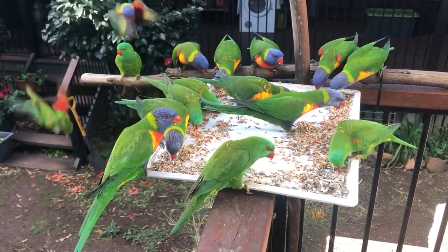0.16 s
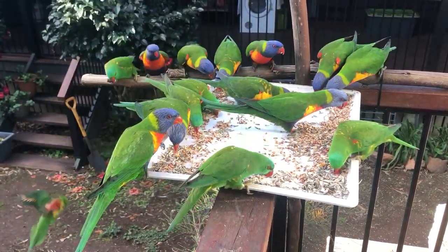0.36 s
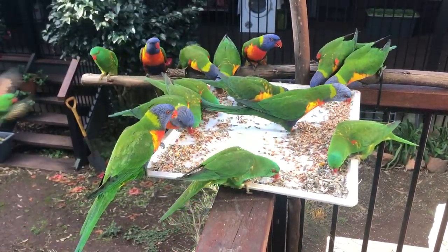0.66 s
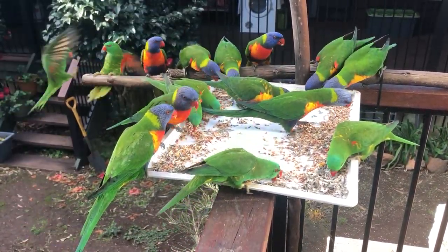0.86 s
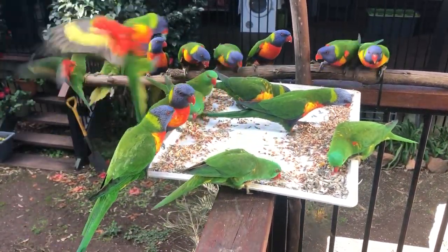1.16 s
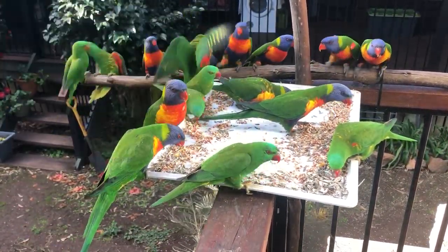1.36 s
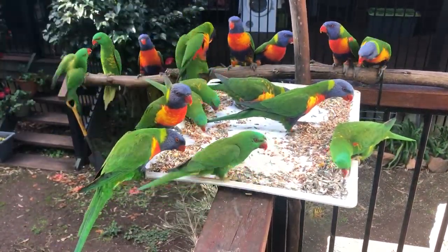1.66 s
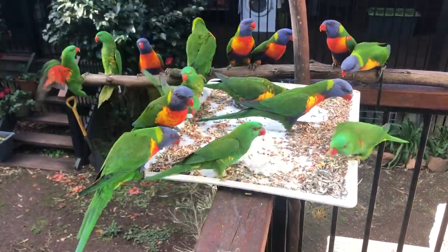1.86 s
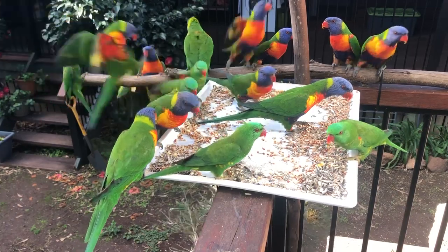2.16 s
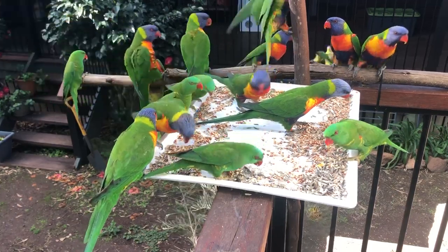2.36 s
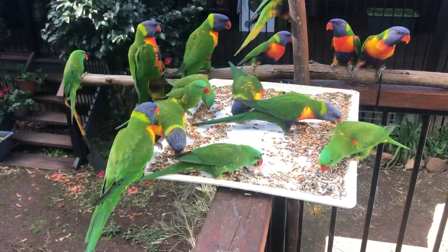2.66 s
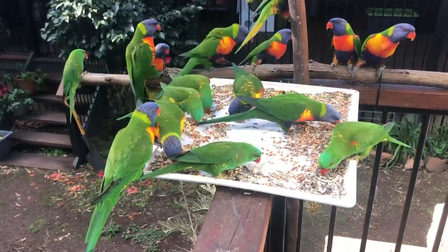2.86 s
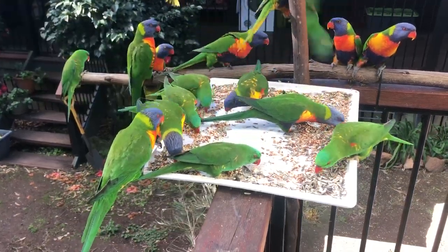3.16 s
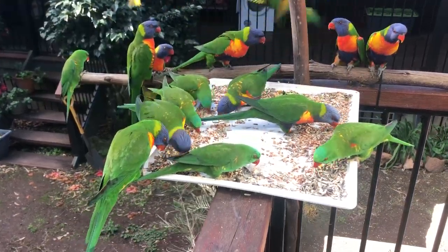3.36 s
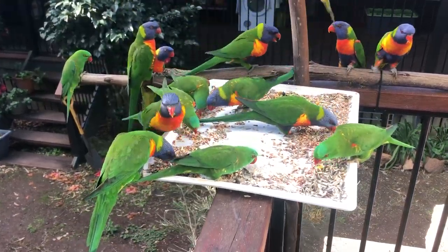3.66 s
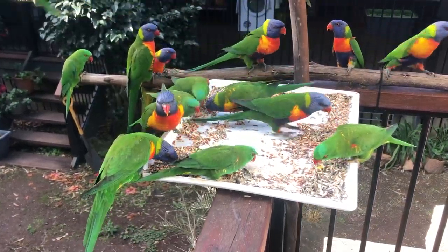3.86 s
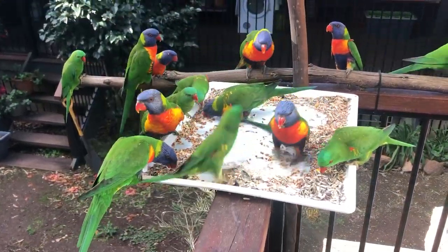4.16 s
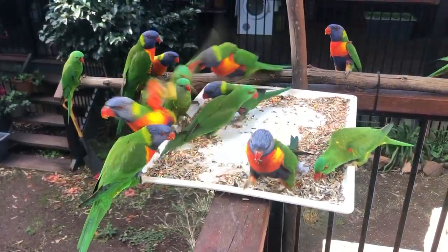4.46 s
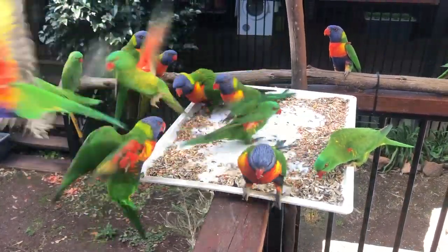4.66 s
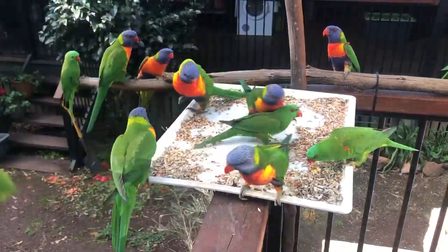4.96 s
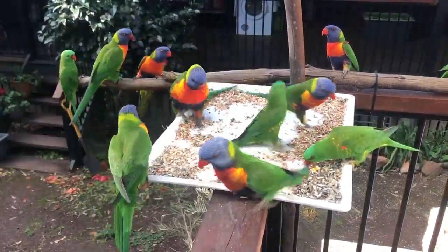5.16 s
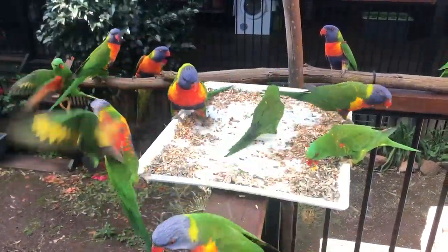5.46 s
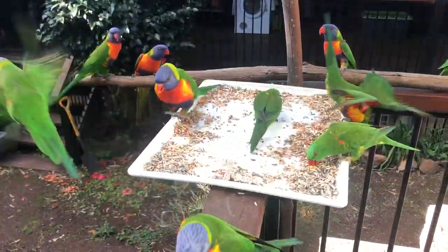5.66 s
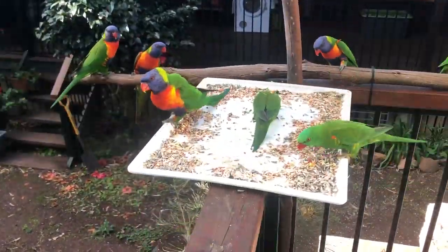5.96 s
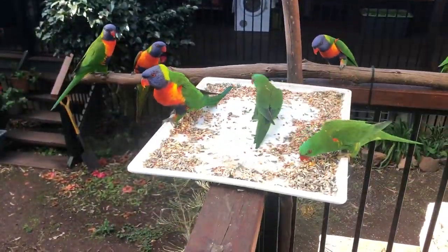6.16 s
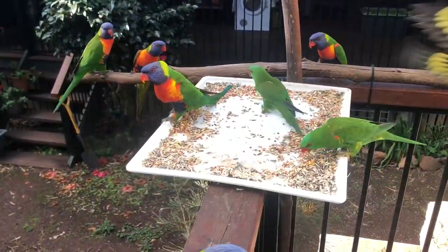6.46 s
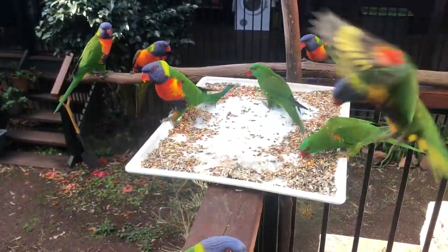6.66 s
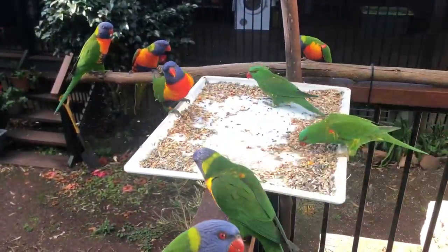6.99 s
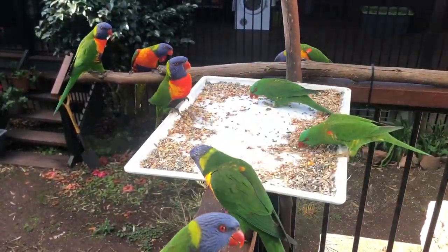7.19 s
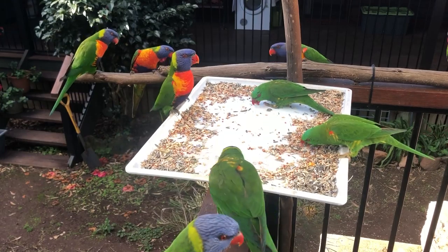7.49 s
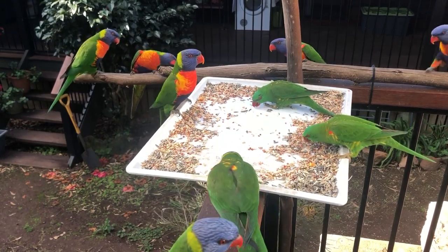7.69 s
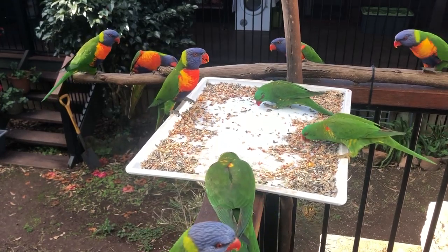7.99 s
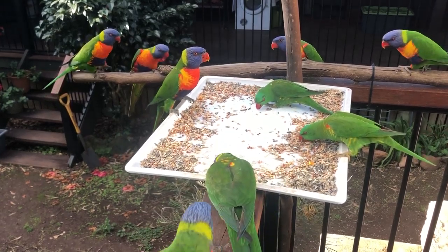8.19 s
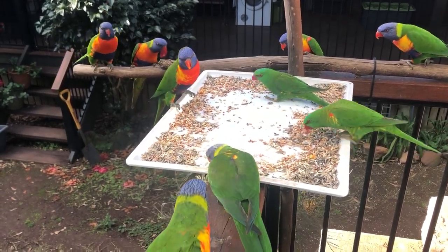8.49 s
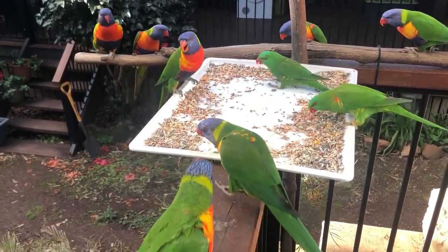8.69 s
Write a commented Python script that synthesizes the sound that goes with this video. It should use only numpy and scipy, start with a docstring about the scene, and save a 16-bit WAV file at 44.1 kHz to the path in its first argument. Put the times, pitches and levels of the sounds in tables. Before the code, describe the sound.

Small parrots squabble outdoors: shrill cracking squeals and buzzing harsh screeches in bursts, soft chatter, light seed ticks and faint wing flutter between.

```python
"""A flock of lorikeets squabbles at a seed tray on an outdoor deck.
Whistled calls glide, break upward, chirp or growl; screeches and squawks are low voices shaken by a fast
rasp; four loud yelps sweep up and tip over. Soft chatter, puffs of filtered noise for wingbeats and short
noise taps for beaks and seeds fill in. Short echoes come from tray, deck and house wall; the air rumbles."""
import sys
import numpy as np
from scipy import signal
from scipy.fft import rfft, irfft, next_fast_len
from scipy.io import wavfile
from scipy.ndimage import uniform_filter1d, minimum_filter1d, map_coordinates

SR = 44100
rng = np.random.default_rng(int(sys.argv[2]) if len(sys.argv) > 2 else 0)


def unload_audio(sound):
    """Save the sound as a 16-bit wav file, at the path given as the first command line argument."""
    columns = np.transpose(np.atleast_2d(sound))
    # keep every value between -1 and 1, then stretch to whole-number steps
    steps = np.round(np.clip(columns, -1, 1) * 32767)
    wavfile.write(sys.argv[1], SR, steps.astype(np.int16))


N = 389403
TIME = np.arange(N) / SR
TOP_HZ = 16000  # no partial is made above this, and the final low-pass cuts everything above it
FAR_DB = -25.5  # calls with a lower level than this count as far birds

# Roughness is 0 for a clean voice, about 1 for a very rough one. Spectra give relative levels.
# air and flock: [t/s, rumble level/dB, rustle level/dB]
STIR = [(0, -52, -52.5), (.7, -59, -49), (1.3, -54, -52), (2.1, -51, -55), (3.2, -55, -53), (3.5, -55, -44),
        (4.3, -65, -49.5), (4.9, -47.5, -47), (5.55, -48.5, -51), (6.9, -53.5, -53), (7.499, -59.5, -63.5),
        (8.8, -67.5, -58)]
# colour of the low air and of feathers and seed: [f/Hz, level/dB]
RUMBLE_COLOUR = [(25, -47), (50, 1), (135, -6.5), (350, -17), (700, -14.5), (1500, -15), (3000, -63)]
RUSTLE_COLOUR = [(200, 8), (1000, 2), (1900, 6.5), (5500, 5), (15500, -3.5)]
# chirps that dip in the middle: [start t/s, end t/s, pitch f/Hz, level/dB, slide/octaves]
CHIRPS = [(.005, .04, 1856, -48, .2), (.076, .125, 1790, -45, 0.037), (.152, .219, 1635, -45, 0.15),
          (.236, .255, 2000, -39.5, -0.16), (.369, .384, 1900, -46, -0.4),
          (1.686, 1.732, 3350, -18.5, -0.12)]
# overtones of chirps and growls: [f/Hz, level/dB]
SOFT_THROAT = [(3000, 4), (5000, -1), (9000, -7.5), (15500, -17.5)]
# overtones of the other whistled calls: [f/Hz, level/dB]
WHISTLE_THROAT = [(2000, -10), (3000, 25), (4400, 14.5), (6000, 3.5), (7500, -5), (9000, -3), (11500, -5.5),
                  (13000, -16.5), (15500, -20)]
# beaks on seeds and tray: [t/s, peak level/dB]
TICKS = [(2.233, -23.5), (4.433, -29), (4.764, -24), (4.921, -21.5), (5.408, -29), (5.435, -23),
         (7.128, -27), (7.194, -28.5)]
# colour of a tap: [f/Hz, level/dB]
TICK_COLOUR = [(120, -20), (1000, -2), (6000, -10.5), (15000, -19.5)]
# rough sagging growls: [start t/s, end t/s, pitch f/Hz, level/dB]
GROWLS = [(.267, .293, 2065, -35), (.384, .468, 1940, -32), (.47, .55, 1795, -36), (3.99, 4.094, 1910, -42),
          (7.6, 7.75, 1380, -53), (8.666, 8.707, 1790, -40)]
# thin whistles of birds further off: [start t/s, end t/s, pitch f/Hz, level/dB]
WHISTLES = [(.525, .625, 4484, -35.5), (.61, .72, 3810, -34), (1.465, 1.5, 5230, -35),
            (2.417, 2.586, 4744, -36), (2.545, 2.588, 3840, -35.5), (2.964, 2.985, 5070, -34.5),
            (3.02, 3.059, 5400, -31)]
# screeches: [start t/s, end t/s, pitch f/Hz, level/dB, swell/dB, beak resonance f/Hz,
#             treble/dB per octave, rasp rate f/Hz, roughness]
SCREECHES = [ (0.716, 0.785, 1408, -24.5, 1, 4800, 7, 115.7, 1.13),
             (1.031, 1.148, 1043, -31, -4, 4150, 7, 115.7, 0.99),
             (1.487, 1.584, 1215, -15.5, -1, 5100, 9.5, 101.1, .8),
             (1.601, 1.65, 1095, -16, -6, 3900, 6.5, 128.2, 1.06),
             (1.71, 1.854, 1122, -17, -6.5, 4590, 8.5, 95.4, 0.9),
             (3.075, 3.096, 1111, -31.5, 2, 4700, 13.5, 120, 0.8),
             (4.082, 4.279, 1114, -21.5, 5.5, 7040, 5.5, 103.9, .95),
             (4.288, 4.378, 1133, -42.5, 1, 5700, 12, 103, 0.6),
             (5.443, 5.511, 1005, -24.5, 4, 3500, 2.5, 168, 1.09),
             (5.617, 5.844, 950, -16, 0, 3760, 5, 170, 0.75),
             (6.937, 7.038, 1205, -41.5, -5, 4070, 4.5, 129.3, 0.66)]
# overtones of a screech: [f/Hz, level/dB]
SCREECH_THROAT = [(450, -19.5), (950, 0.5), (1600, -3), (2800, 5), (4400, 2.5), (5600, 3), (7500, -4.5),
                  (9500, -8.5), (11000, -11.5), (15500, -23)]
# unbroken low-register glides: [overtones/dB, roughness, path of [t/s, pitch f/Hz, level/dB]]
SQUEALS = [ (0, 0.16, [(.744, 3150, -17.5), (.775, 2816, -27.5), (.81, 3296, -11), (.832, 3275, -13),
           (.897, 3867, 0), (.93, 3680, -12), (1.0, 3630, -10.5)]), (0.5, 0.17, [(2.292, 2760, -33),
           (2.322, 2510, -24), (2.34, 3080, -20.5), (2.378, 2600, -21.5), (2.41, 2935, -15.5),
           (2.45, 2825, -15.5), (2.486, 3017, -22)]), (-3.5, 0.5, [(2.762, 2360, -23), (2.79, 3110, -18.5),
           (2.888, 2435, -28), (2.911, 2655, -22.5)]), (-11.5, 0.036, [(3.642, 3190, -19),
           (3.69, 2920, -12.5), (3.718, 3190, -15), (3.738, 3570, -8.3), (3.758, 3760, -9.5),
           (3.841, 3796, -8.5), (3.849, 3480, -23)]), (8.5, .04, [(7.494, 1994, -44.5), (7.522, 2055, -38),
           (7.555, 2410, -33.5), (7.585, 3077, -22), (7.626, 3180, -14)]), (2, 0.11, [(7.607, 2648, -20),
           (7.655, 3118, -18), (7.713, 3200, -12.5), (7.73, 2650, -13.5)]), (5, 0.53, [(7.745, 2640, -36),
           (7.773, 3260, -19), (7.79, 2774, -18.5), (7.83, 2766, -22.5), (7.888, 3244, -18.5)]),
           (2.5, 0.31, [(7.886, 3245, -25), (7.91, 3075, -17), (7.945, 3280, -26), (7.975, 3240, -20.5),
           (8.01, 2745, -23.5)])]
# flips into the pure high register: [start t/s, end t/s, pitch f/Hz, level/dB, slide/octaves]
BREAKS = [(0.786, 0.813, 4375, -15, 0.062), (0.84, 0.894, 4637, -10.5, -0.01), (.966, 1, 4340, -12, -0.1),
          (2.292, 2.306, 3290, -23, .13), (2.343, 2.369, 4035, -13.5, -0.25),
          (2.79, 2.807, 4102, -11, 0.0091), (2.82, 2.835, 3460, -11, -0.28),
          (2.853, 2.892, 3780, -11, -.16), (3.643, 3.665, 3790, -11.5, -0.3),
          (3.69, 3.712, 3860, -8, -0.051), (7.827, 7.85, 4176, -16.5, -0.0012)]
# flights: [start t/s, end t/s, wingbeat rate f/Hz, level/dB]
FLIGHTS = [(1.878, 2.245, 16.2, -45), (4.604, 5.065, 15.1, -42.5), (5.885, 6.983, 14.3, -49.5)]
# colour of a wingbeat: [f/Hz, level/dB]
WING_COLOUR = [(30, 2), (110, 6), (400, -6), (1300, -4), (2000, 0.5), (3000, -18), (15000, -19)]
# rising croaks: [start t/s, end t/s, pitch f/Hz, level/dB, roughness]
CROAKS = [(2.235, 2.274, 984, -45, 0.24), (2.272, 2.316, 1837, -35.5, 0.4), (2.696, 2.717, 1276, -34, 0.65),
          (2.729, 2.758, 1225, -24.5, 0.54), (3.543, 3.567, 1700, -24, 0.1),
          (3.554, 3.636, 1475, -19, 0.01), (5.2, 5.227, 2984, -21, 0.13), (8.696, 8.704, 1080, -30.5, 0.65)]
# squawks: [start t/s, end t/s, pitch f/Hz, level/dB, swell/dB]
SQUAWKS = [(4.467, 4.591, 1112, -15, 1.5), (5.082, 5.202, 1078, -13, -8.5)]
# how a squawk cracks and clears: [share of its length, roughness]
SQUAWK_ROUGH = [(0.221, .1), (0.382, 0.9), (.72, .7), (.95, 0.4)]
# yelps: [t of the top/s, top pitch f/Hz, level at full effort/dB]
YELPS = [(8.115, 3117, -10), (8.371, 3116, -9), (8.564, 3056, -8), (8.793, 3016, -9.5)]
# shape of a yelp: [t from its top/s, share of the top pitch, effort level/dB]
YELP_SHAPE = [(-.092, .59, -27), (-.072, .67, -12.5), (-.06, .76, -14.5), (-.048, 0.807, -2.5),
              (-.022, .94, -0.5), (-.004, 0.99, -0.5), (0.01, .98, -0.5), (.021, .87, -6.5),
              (0.033, 0.774, -16)]
# overtones of a yelp: [f/Hz, level/dB]
YELP_THROAT = [(1800, -3.5), (3100, 0), (3900, -12.5), (5000, 12.5), (6100, 6.5), (7500, 0), (9200, 0),
               (12000, -6), (15500, -15)]
# first echoes from tray, deck, rail and wall: [delay t/s, level/dB]
ECHOES = [(.0023, -17), (.0061, -17), (0.0098, -22.5)]
# colour of the later echoes: [f/Hz, level/dB]
ECHO_COLOUR = [(300, -8.0), (2000, -5.5), (5500, -7.5), (9000, -10.5), (15000, -3)]


def undb(db):
    """Decibels to gain."""
    return 10 ** (np.asarray(db) / 20)


def unit(x):
    """Scale to an rms (average strength) of 1."""
    return x / np.sqrt(np.mean(x ** 2) + 1e-18)


def gain_at(hz, points):
    """Gain of a spectrum table at the given frequencies."""
    f, db = np.transpose(points)
    return undb(np.interp(np.log(np.maximum(hz, 1)), np.log(f), db))


def colour(x, points):
    """Filter by a spectrum table, then scale to rms 1."""
    size = next_fast_len(len(x))
    gains = gain_at(np.fft.rfftfreq(size, 1 / SR), points)
    return unit(irfft(rfft(x, size) * gains, size)[:len(x)])


def walk(count, rate):
    """A smooth random wander through `rate` random values a second; its spread is near 1."""
    at = np.arange(count) * rate / SR
    return map_coordinates(rng.standard_normal(4096), [at], order=3, mode="wrap")


def fade(count, attack, release):
    """Rounded rise and fall of a sound; both times in seconds."""
    t = np.arange(count) / SR
    rise = np.sin(np.pi / 2 * np.clip(t / attack, 0, 1))
    fall = np.sin(np.pi / 2 * np.clip(t[::-1] / release, 0, 1))
    return rise * fall


def add(out, start, x):
    """Mix a sound in at its time."""
    i = max(int(start * SR), 0)
    x = x[:max(N - i, 0)]
    out[i:i + len(x)] += x


def surroundings():
    """Low stirring air, and the rustle of feathers and seed: two noises of wandering level."""
    s, low_db, high_db = np.transpose(STIR)
    rumble_db = np.interp(TIME, s, low_db) + 2 * walk(N, 13)
    rumble = colour(rng.standard_normal(N), RUMBLE_COLOUR) * undb(rumble_db)
    rustle_db = np.interp(TIME, s, high_db) + 2 * walk(N, 26)
    rustle = colour(rng.standard_normal(N), RUSTLE_COLOUR) * undb(rustle_db)
    return rumble + rustle


def bend(seconds, hz, slide, arch):
    """A pitch that slides from start to end and arches in the middle, both in octaves."""
    u = np.linspace(-1, 1, int(max(seconds, .005) * SR))
    return hz * 2 ** (slide * u / 2 - arch * u ** 2)


def harmonics(hz, lag=0.25):
    """All partials of the syrinx (a bird's voice organ), one row each; the windpipe delays upper ones."""
    k = np.arange(1, int(TOP_HZ / hz.min()) + 2)[:, None]
    phase = k * 2 * np.pi * np.cumsum(hz) / SR - lag * k ** 2
    return k * hz, np.sqrt(2) * np.sin(phase) * (k * hz < TOP_HZ)


def syrinx(hz, db, over_db, rough, throat=WHISTLE_THROAT, jitter=0.065, trill=0.033, trill_hz=150,
           shimmer_db=4, waver=0.012, waver_db=2):
    """A near-pure wavering whistle; when rough, the membranes flutter and the pitch trembles."""
    n = len(hz)
    flutter = np.sin(2 * np.pi * np.cumsum(trill_hz * (1 + 0.092 * walk(n, 69.6))) / SR)
    # tremble and flutter grow with roughness, the slower waver with its square root
    shake = rough * (jitter * walk(n, 1394) + trill * flutter)
    slow_waver = waver * np.sqrt(abs(rough)) * walk(n, 103)
    f, waves = harmonics(hz * (1 + shake + slow_waver))
    overtones = unit((gain_at(f[1:], throat) * waves[1:]).sum(0) * undb(2 * walk(n, 88.2)))
    share = undb(over_db)
    tone = (waves[0] + share * overtones) / np.hypot(1, share)
    tremor_db = rough * shimmer_db * (flutter + walk(n, 400)) / 2 + waver_db * walk(n, 64.6)
    return undb(db) * tone * unit(undb(tremor_db)) * fade(n, 0.0018, 0.0011)


def note(seconds, hz, db, slide, arch, over_db, rough, throat=WHISTLE_THROAT):
    """One short bent note from the syrinx."""
    return syrinx(bend(seconds + 0.0014, hz, slide, arch), db, over_db, rough, throat)


def chirp(seconds, hz, db, slide):
    """A clean note whose pitch dips in the middle, with overtones as strong as its base tone."""
    return note(seconds, hz, db, slide, arch=-0.17, over_db=0, rough=0.026, throat=SOFT_THROAT)


def chatter(count=90, pitch_hz=1900, above_db=-1):
    """Birds further back mutter short rough notes, louder when the flock rustles more."""
    out = np.zeros(N)
    s, _, stir_db = np.transpose(STIR)
    for i, (when, size, height, slide, arch) in enumerate(rng.uniform(-1, 1, (count, 5))):
        start = (i + when) / count * N / SR
        db = np.interp(start, s, stir_db) + above_db + 3 * size
        hz = pitch_hz * 2 ** (.35 * height)
        mutter = note(.025 + .012 * size, hz, db, .25 * slide, .12 * arch, over_db=-6.5, rough=0.84)
        add(out, start, mutter)
    return out


def ticks(ring_s=0.004, small_db=18, count=70):
    """Dying bursts of noise: taps of beaks and claws, and small husk cracks that follow the flock's stir."""
    out, t = np.zeros(N), np.arange(1024) / SR
    s, _, stir_db = np.transpose(STIR)
    taps = list(TICKS)
    for when, strength in rng.random((count, 2)):
        start = when * N / SR
        taps.append((start, np.interp(start, s, stir_db) + small_db + 12 * (strength - .5)))
    for start, db in taps:
        burst = rng.standard_normal(len(t)) * np.exp(-t / ring_s)
        tap = colour(np.roll(burst, 64), TICK_COLOUR)  # moved later, so the filter has room to start
        add(out, start - .001, undb(db) * tap / abs(tap).max())
    return out


def growl(seconds, hz, db):
    """A sagging note made very rough by strong flutter of the membranes."""
    return note(seconds, hz, db, slide=-.14, arch=0, over_db=-4.5, rough=1.3, throat=SOFT_THROAT)


def whistle(seconds, hz, db):
    """A thin, slightly falling note with weak overtones."""
    return note(seconds, hz, db, slide=-.06, arch=0.015, over_db=-12, rough=0.23)


def rasping_voice(hz, db, swell_db, beak_hz, tilt_db, rasp_hz, rough, jitter=.035, swing=0.11,
                  rasp_db=4.5, hiss_db=-16, beak_db=10, beak_width=0.093, open_s=0.055, fade_s=0.018):
    """A low buzzing voice thrown about by a fast uneven rasp; the beak lifts partials near its resonance."""
    n = len(hz)
    turn = 2 * np.pi * np.cumsum(rasp_hz * (1 + 0.189 * walk(n, 99.7))) / SR
    rasp_level = undb(rough * rasp_db * np.sin(turn) / 2)
    # the pitch slides down through each burst; a rasp faster than 105 Hz has less time to swing it
    pitch_swing = swing * 105 / rasp_hz * np.cos(turn)
    shake = rough * (jitter * walk(n, 1100) + pitch_swing + 0.036 * walk(n, 70))
    _, waves = harmonics(hz * (1 + shake))
    partial_hz = np.median(hz) * np.arange(1, len(waves) + 1)
    beak_lift_db = beak_db / (1 + (np.log2(partial_hz / beak_hz) / beak_width) ** 2)
    treble_db = tilt_db * np.log2(np.clip(partial_hz / 3000, 1, 3.2))
    gains = undb(beak_lift_db + treble_db)
    flicker = undb(rough * 4.0 * np.array([walk(n, 112.5) for _ in waves]))  # energy hops between partials
    buzz = unit(gains @ (waves * flicker))
    air = rng.standard_normal(n) * (1 + waves[0] / 2)  # air escapes once a cycle
    voice = colour(buzz + rough * undb(hiss_db) * air, SCREECH_THROAT)
    # the treble needs full effort: it comes late, leaves early and beats with the rasp
    body = signal.sosfiltfilt(signal.butter(2, 5500, fs=SR, output="sos"), voice)
    treble = voice - body
    voice = body + treble * fade(n, open_s, open_s / 2) * rasp_level
    swell = undb(swell_db * np.linspace(0, 1, n))
    return undb(db) * unit(voice * rasp_level * swell) * fade(n, fade_s, fade_s)


def screech(seconds, hz, db, *voice):
    """A rasping voice on a slightly arched pitch."""
    return rasping_voice(bend(seconds + 0.011, hz, slide=0, arch=.04), db, *voice)


def squeal(over_db, rough, path, flip_s=.003):
    """A long gliding whistle; its low register falls silent wherever the voice breaks upward."""
    s, hz, db = np.transpose(path)
    t = np.arange(s[0], s[-1], 1 / SR)
    broken = np.zeros(len(t))
    for start, end, *_ in BREAKS:
        broken += np.clip(np.minimum(t - start, end - t) / flip_s + .5, 0, 1)
    pitch = uniform_filter1d(np.interp(t, s, hz), size=300)
    return syrinx(pitch, np.interp(t, s, db), over_db, rough) * np.clip(1 - broken, 0, 1)


def upward_break(seconds, hz, db, slide):
    """The high register of a broken squeal: an almost pure arched note."""
    return note(seconds, hz, db, slide, arch=0.076, over_db=-16, rough=0.04)


def wings(depth_db=7):
    """Each downstroke pushes a puff of air through the feathers."""
    out = np.zeros(N)
    for start, end, rate, db in FLIGHTS:
        n = int((end - start) * SR)
        stroke = -np.cos(2 * np.pi * np.cumsum(rate * (1 + .02 * walk(n, 10))) / SR)
        puffs = unit(colour(rng.standard_normal(n), WING_COLOUR) * undb(depth_db * stroke))
        add(out, start, undb(db) * puffs * fade(n, 0.0077, 0.095))
    return out


def croak(seconds, hz, db, rough):
    """A rising note whose overtones are stronger than its base tone."""
    return note(seconds, hz, db, slide=0.11, arch=0.0107, over_db=8, rough=rough)


def squawk(seconds, top_hz, db, swell_db):
    """An arched rasping voice that starts clean, cracks into a rattle near its top and clears as it falls."""
    hz = bend(seconds + .006, top_hz, slide=0.024, arch=0.33)
    rough = np.interp(np.linspace(0, 1, len(hz)), *np.transpose(SQUAWK_ROUGH))
    return rasping_voice(hz, db, swell_db, beak_hz=3830, tilt_db=6.5, rasp_hz=83.06, rough=rough,
                         swing=0.075, rasp_db=8, beak_db=15, beak_width=0.19, fade_s=0.024)


def yelp(top_hz, db, jitter=0.0053):
    """A loud upward sweep that tips over; the second partial carries it."""
    s, share, effort_db = np.transpose(YELP_SHAPE)
    t = np.arange(s[0], s[-1], 1 / SR)
    hz = top_hz * uniform_filter1d(np.interp(t, s, share), size=300)
    f, waves = harmonics(hz * (1 + jitter * walk(len(t), 900)))
    gains = gain_at(f, YELP_THROAT)
    voice = (gains * waves).sum(0) / np.sqrt((gains ** 2).sum(0))  # even strength all through
    return voice * undb(db + np.interp(t, s, effort_db)) * fade(len(t), 0.013, 0.0049)


def voices():
    """Every single call of the flock, as (start in s, level in dB, sound)."""
    simple_calls = [(CHIRPS, chirp), (GROWLS, growl), (WHISTLES, whistle), (SCREECHES, screech),
                    (BREAKS, upward_break), (CROAKS, croak), (SQUAWKS, squawk)]
    for rows, make_call in simple_calls:
        for start, end, hz, db, *settings in rows:
            yield start, db, make_call(end - start, hz, db, *settings)
    for over_db, rough, path in SQUEALS:
        loudest_db = max(db for *_, db in path)
        yield path[0][0], loudest_db, squeal(over_db, rough, path)
    for top, hz, db in YELPS:
        yield top + YELP_SHAPE[0][0], db, yelp(hz, db)


def calls():
    """All these calls in two rows: birds at the tray, and the quieter ones further off."""
    out = np.zeros((2, N))
    for start, db, sound in voices():
        add(out[int(db < FAR_DB)], start, sound)
    return out


def deck(x, t60=0.46, tail_db=-17, scatter_db=-6.5, scatter_s=0.019):
    """Near surfaces echo at once; roof and house wall leave a short blurred tail."""
    t = np.arange(SR) / SR
    tail_noise = rng.standard_normal(SR) * undb(-60 * t / t60)  # falls 60 dB in t60 seconds
    tail = colour(tail_noise * np.clip(t / 0.022, 0, 1), ECHO_COLOUR)
    scatter = colour(rng.standard_normal(SR) * np.exp(-t / scatter_s) * (t > .003), ECHO_COLOUR)
    blur = undb(tail_db) * tail + undb(scatter_db) * scatter
    response = blur / np.sqrt(SR) * 0.83  # 0.83 turns both down a little further
    response[0] += 1  # the direct sound
    for delay, db in ECHOES:
        response[int(delay * SR)] += undb(db)
    return signal.fftconvolve(x, response)[:N]


def scene():
    """The flock on the deck; far birds come with more echo, and 3 dB above their listed levels."""
    near, far = calls()
    near_sound = deck(near + ticks() + wings())
    far_sound = undb(3.0) * deck(far + chatter(), tail_db=-8.5, scatter_db=-3.5)
    return (near_sound + far_sound + surroundings())[None]


def record(dry, ceiling=0.81):
    """A limiter smoothly turns down the loudest peaks, and the top above TOP_HZ is cut."""
    needed = ceiling / np.maximum(abs(dry), ceiling)
    gain = uniform_filter1d(minimum_filter1d(needed, size=400), size=400)
    low_pass = signal.ellip(10, .2, 80, TOP_HZ, fs=SR, output="sos")
    return signal.sosfilt(low_pass, dry * gain)


dry = scene()
out = record(dry)
unload_audio(out)
```